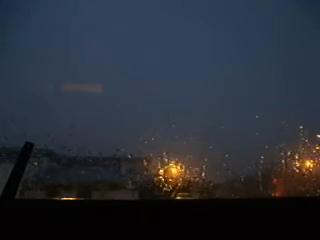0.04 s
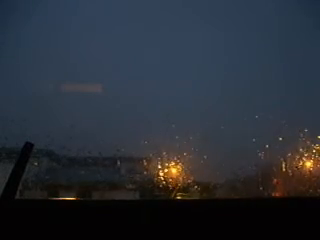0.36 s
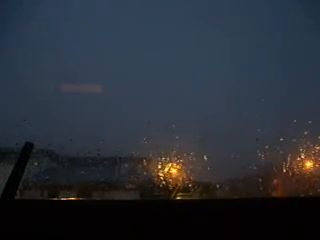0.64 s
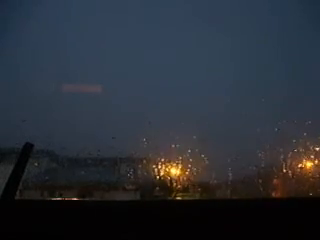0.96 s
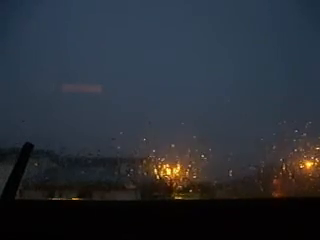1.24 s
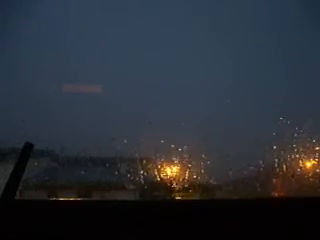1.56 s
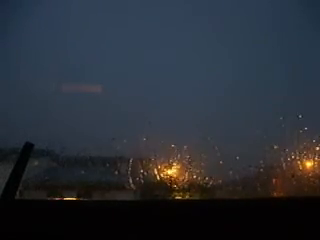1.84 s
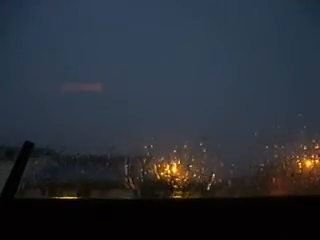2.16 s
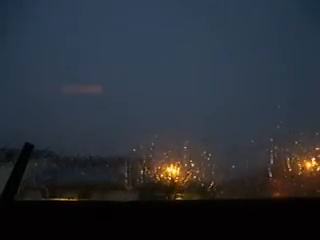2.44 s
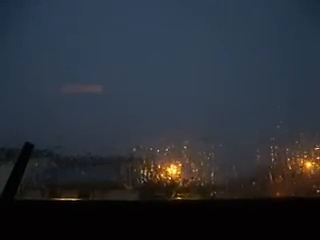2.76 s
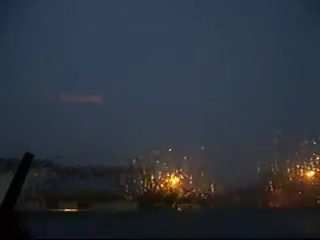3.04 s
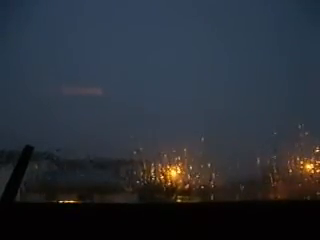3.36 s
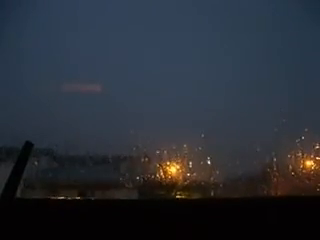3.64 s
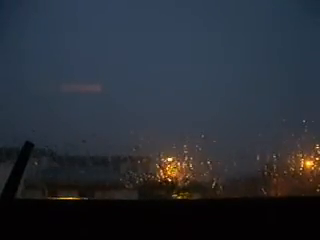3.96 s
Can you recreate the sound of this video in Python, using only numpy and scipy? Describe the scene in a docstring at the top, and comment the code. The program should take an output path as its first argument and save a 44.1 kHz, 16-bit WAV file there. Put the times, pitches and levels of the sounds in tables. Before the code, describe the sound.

Steady rain patters on a car windshield, with heavier drops ticking and splatting close by over a wash of rain on the street. Gusts of wind hit the microphone in short, low rumbles and pops.

```python
"""At a wet window above a street, one microphone out in a rainstorm.
Far off, rain on the street merges into a wash. Close by, fine drops patter on the pane, stray ones
tick brightly and heavy ones ring or splat. Gusts buffet the microphone: a low, ragged rumble that
brightens with force and pops when a strong eddy passes. The electronics add a faint whine."""
import sys
import numpy as np
from scipy import signal
from scipy.fft import rfft, irfft
from scipy.io import wavfile
from scipy.ndimage import map_coordinates

SR = 44100
rng = np.random.default_rng(int(sys.argv[2]) if len(sys.argv) > 2 else 0)


def put_to_file(sound):
    """Save the sound as 16-bit audio at rate SR, in the file named by the first command-line argument."""
    columns = np.atleast_2d(sound).T  # one column per channel
    safe = np.clip(columns, -1, 1)
    whole_steps = np.round(safe * 32767)
    wavfile.write(sys.argv[1], SR, whole_steps.astype(np.int16))


N = 176400
T = np.arange(N) / SR

# gusts on the microphone: start_s, length_s, level_db
GUSTS = [(0.34, 0.019, -36.5), (.865, 0.045, -34.5), (.953, 0.048, -35), (1.006, 0.034, -37),
         (1.133, 0.045, -31), (1.191, 0.04, -29), (1.292, 0.1, -34), (1.393, .04, -36.5),
         (1.466, 0.016, -30), (1.494, .035, -35.5), (1.623, 0.027, -31.5), (2.043, .012, -30),
         (2.064, .045, -28), (2.364, 0.019, -47), (2.7, .07, -36), (2.772, 0.047, -30), (2.826, 0.035, -32),
         (2.892, 0.056, -37), (2.935, .047, -35), (3.001, 0.087, -35.5), (3.264, 0.012, -38.5),
         (3.458, 0.021, -37), (3.505, 0.038, -36), (3.634, .05, -31.5), (3.731, .018, -36.5),
         (3.798, 0.068, -34.5), (3.834, .018, -34), (3.905, 0.011, -36.5), (3.94, .049, -36.5)]
# lighter wind between the gusts: time_s, level_db
BREEZE_LEVEL = [(0, -49.5), (.6, -45.5), (.85, -40.5), (1.5, -38), (1.75, -45), (2.1, -40.5), (2.45, -49),
                (2.9, -35.5), (3.35, -56.5), (4, -48)]
# turbulence at the reference wind force: frequency_hz, density_db
WIND_SPECTRUM = [(20, -8), (40, -2.5), (70, 2), (140, -0.5), (300, -1.5), (550, -10), (800, -12.5),
                 (1200, -30), (2000, -24), (3500, -64)]
# lift or cut of the wind's deep bass: time_s, gain_db
WIND_BASS_GAIN = [(0, -11), (.8, -4), (1.5, -7), (2.1, -3.5), (2.9, 3.5), (3.4, 4.5), (4, 2.5)]
# distant rain on the street: frequency_hz, density_db
WASH_SPECTRUM = [(30, -15.5), (100, 2.5), (250, -2.5), (500, 1.5), (800, 0), (1250, -2.5), (1900, -1),
                 (2600, -6.5), (4000, -9.5), (7000, -16.5), (8500, -24), (9700, -25.5), (11000, -47)]
# swell of the street rain: time_s, level_db
WASH_LEVEL = [(0, -42), (.7, -42.5), (1.3, -41), (1.8, -40), (2.3, -39.5), (2.8, -39.5), (3.3, -42),
              (4, -41)]
# fine drops on the pane: frequency_hz, density_db
PATTER_SPECTRUM = [(500, -23.5), (1200, -4), (2000, -3), (2700, 1), (3300, 4), (3900, -0.5), (4500, -3),
                   (6000, -8.5), (7200, -20), (8500, -14.5), (9700, -33), (11000, -45)]
# rise and fall of the rain on the pane: time_s, level_db
PATTER_LEVEL = [(0, -44), (.35, -47.5), (.8, -45), (1.2, -41), (1.42, -44.5), (1.6, -41), (1.78, -52.5),
                (1.88, -41.5), (2.15, -48), (2.35, -44.5), (2.58, -46.5), (2.85, -43.5), (3.1, -45),
                (3.4, -55), (3.7, -47.5), (4, -50)]
# tones from the electronics: pitch_hz, level_db
WHINE_TONES = [(8122, -73.5), (9868, -82)]
# stray light drops on the glass: frequency_hz, density_db
TICK_SPECTRUM = [(1000, -24), (3000, -4), (4500, 2), (6500, 0.5), (9000, -2), (11000, -30)]
# heavy drops close by: start_s, level_db, pitch_hz, ring_gain, spray_width_octaves, spray_decay_s
BIG_DROPS = [(.027, -34, 5500, .2, .7, .006), (0.4322, -25.5, 4120, 0.8, 0.51, 0.012),
             (.508, -27.5, 6500, 0.4, 0.42, 0.0057), (.647, -19.5, 1430, 0.6, 0.43, .007),
             (.741, -22.5, 4500, .6, 0.54, .005), (.906, -29, 4460, .4, 0.48, .009),
             (.9602, -33, 4500, .4, 0.56, .006), (1.022, -34, 5500, .3, 0.42, .01),
             (1.05, -27.5, 4800, .3, 0.58, 0.011), (1.327, -30, 4200, .4, 0.39, .006),
             (1.4918, -31, 5200, .3, 0.44, 0.0045), (1.5698, -22, 4300, 0.6, 0.47, 0.0054),
             (1.665, -23.5, 4200, .9, .25, .012), (1.677, -30, 4900, .4, 0.35, 0.011),
             (1.727, -35, 4800, .3, 0.62, .004), (1.8367, -17.5, 4560, 0.76, .25, .0065),
             (1.839, -23, 1100, .2, .7, 0.0087), (2.0915, -25.5, 3800, .3, 0.44, 0.0055),
             (2.1777, -20, 2270, .2, .7, 0.01), (2.335, -30.5, 5500, .2, .6, 0.033),
             (2.479, -22.5, 4800, 0.8, 0.36, .0083), (2.6524, -27, 3470, .4, 0.41, 0.029),
             (2.696, -31.5, 6560, 0.4, .6, .007), (2.8262, -21.5, 4950, 0.6, .25, .005),
             (2.836, -29, 5100, .5, .25, 0.014), (2.86, -22, 2900, .15, .55, .01),
             (2.894, -29, 6000, .2, 0.48, 0.01), (2.9, -26, 3300, .8, .3, 0.0046),
             (2.962, -22, 3300, 0.1, 0.55, .0081), (2.989, -34, 5500, .3, .6, .008),
             (3.1587, -30, 3860, .7, .3, .007), (3.9, -28, 4200, .4, 0.37, .012)]
# strong eddies at the microphone: centre_s, level_db, pitch_hz, swirl_relative_db
EDDIES = [(.343, -28, 300, 0), (.851, -24, 477, -8), (0.8584, -21, 340, -12), (0.8881, -27.5, 277, 2.5),
          (0.8969, -20, 553, -5), (.977, -24.5, 646, -6), (.982, -20, 342, -5.5), (1.151, -12.5, 516, -13),
          (1.165, -20, 680, -7), (1.2011, -23, 430, -7), (1.2276, -17.5, 423, -10),
          (1.4089, -17, 466, -3.5), (1.4592, -9.5, 300, -18), (1.479, -17.5, 700, -18),
          (2.0086, -16.5, 430, -14), (2.0134, -13, 443, -11), (2.0368, -13.5, 850, -20),
          (2.058, -21, 700, -10), (2.068, -14, 400, -7), (2.0721, -6.5, 680, -7), (2.083, -25, 650, -10),
          (2.0928, -9.5, 550, -5), (2.099, -16, 480, -6), (2.1102, -12, 350, -7), (2.1225, -11.5, 354, -20),
          (2.7265, -17.5, 348, -17), (2.7585, -17.5, 500, -16), (2.7867, -16, 630, -12),
          (2.793, -21, 750, -14), (2.7985, -18.5, 416, -0.5), (2.8082, -12.5, 720, -10),
          (2.835, -18, 710, -6.5), (2.883, -13, 450, -9), (2.946, -13, 600, -10), (2.9517, -5.5, 450, -15),
          (2.962, -14, 380, -16), (2.981, -16, 380, -9), (3.015, -23, 450, -10), (3.042, -14, 220, -12),
          (3.0487, -13.5, 340, -17), (3.054, -21, 530, -7), (3.269, -23.5, 294, -16),
          (3.6376, -23, 219, -15), (3.657, -16, 594, -10), (3.677, -12.5, 242, -15),
          (3.797, -20.5, 500, -18), (3.831, -19, 550, -14), (3.845, -11, 520, -2.5),
          (3.9135, -23, 220, -15)]


def undb(db):
    """Decibels to gain."""
    return 10 ** (np.asarray(db) / 20)


def unit(x):
    """Scale to rms 1."""
    return x / np.sqrt(np.mean(x ** 2))


def curve(rows):
    """Join (time_s, value) points by straight lines."""
    return np.interp(T, *np.array(rows).T)


def db_at(spectrum, hz):
    """Read a spectrum on a log-frequency axis."""
    points_hz, db = np.array(spectrum).T
    return np.interp(np.log(hz + 1e-3), np.log(points_hz), db)


def colour(x, spectrum):
    """Minimum-phase filter with the given spectrum."""
    gain = undb(db_at(spectrum, np.fft.rfftfreq(4096, 1 / SR)))
    cepstrum = irfft(np.log(gain))
    cepstrum[1:2048] *= 2  # fold onto positive time, so nothing rings before a hit
    cepstrum[2049:] = 0
    impulse = irfft(np.exp(rfft(cepstrum)))
    return signal.fftconvolve(x, impulse)[:len(x)]


def band_noise(hz, octaves, size):
    """Noise of rms 1 in a bell-shaped band."""
    away = np.log2((np.fft.rfftfreq(size, 1 / SR) + 1e-3) / hz) / octaves
    return unit(irfft(rfft(rng.standard_normal(size)) * np.exp(-.5 * away ** 2), size))


def wander(per_s):
    """Smooth random drift of rms 1."""
    knots = rng.standard_normal(2048)
    return unit(map_coordinates(knots, [T * per_s], order=3, mode="mirror"))


def with_tails(hits, decay_s):
    """Give every hit an exponential tail."""
    return signal.lfilter([1], [1, -np.exp(-1 / (decay_s * SR))], hits)


def add(out, x, at_s):
    """Mix a sound in at a time."""
    i = int(at_s * SR)
    out[i:i + len(x)] += x[:N - i]


def wind(attack_s=0.011, release_s=0.017, gust_trim_db=-1, reference_db=-28.5, bass_hz=130):
    """Turbulence right on the microphone: the harder the gust, the smaller and brighter its eddies."""
    power = undb(curve(BREEZE_LEVEL)) ** 2
    for start_s, length_s, level_db in GUSTS:
        before = np.maximum(start_s - T, 0) / attack_s
        after = np.maximum(T - start_s - length_s, 0) / release_s
        envelope = np.exp(-np.minimum(before + after, 20))
        power += (undb(level_db + gust_trim_db) * envelope) ** 2
    force_db = 10 * np.log10(power) - reference_db
    bands_hz = 25 * 2 ** np.arange(0, 7, .5)
    weights = undb(db_at(WIND_SPECTRUM, bands_hz)) * np.sqrt(bands_hz)
    rumble, bass_db = np.zeros(N), curve(WIND_BASS_GAIN)
    for hz, weight in zip(bands_hz, weights / np.linalg.norm(weights)):
        brighten_db = 0.41 * force_db * np.log2(max(hz / 200, 1))  # tilts the bands above 200 Hz
        shelf_db = bass_db / (1 + (hz / bass_hz) ** 4)
        rumble += weight * undb(brighten_db + shelf_db) * band_noise(hz, octaves=0.25, size=N)
    ragged_db = 4.5 * np.tanh(wander(per_s=140))
    return rumble * np.sqrt(power) * unit(undb(ragged_db))


def street_wash(flicker_db=0.74):
    """Countless distant drops on the street merge into a hiss."""
    hiss = unit(colour(rng.standard_normal(N), WASH_SPECTRUM))
    return hiss * undb(curve(WASH_LEVEL) + flicker_db * wander(per_s=18))


def pane_patter(drops_per_s=2500, spread_db=3, splash_share=0.44, flurry_db=1.22):
    """Fine drops of very uneven size strike the pane in flurries, each with a tiny splash."""
    lands = rng.random(N) < drops_per_s / SR
    sizes = undb(spread_db * np.minimum(rng.exponential(size=N), 6))
    hits = unit(lands * sizes * rng.choice([-1, 1], N))
    splash_power = with_tails(hits ** 2, decay_s=0.0034)
    splash = unit(np.sqrt(splash_power) * rng.standard_normal(N))
    drops = np.sqrt(1 - splash_share) * hits + np.sqrt(splash_share) * splash
    level_db = curve(PATTER_LEVEL) + flurry_db * wander(per_s=29.94)
    return unit(colour(drops, PATTER_SPECTRUM)) * undb(level_db)


def electronics_whine():
    """Thin steady tones from the electronics, faint under the rain."""
    return sum(np.sqrt(2) * undb(db) * np.sin(2 * np.pi * hz * T) for hz, db in WHINE_TONES)


def stray_ticks(ticks_per_s=16, spread_db=8.5, relative_db=-16.5):
    """Now and then a light drop on the glass stands out of the patter as a short bright burst."""
    lands = rng.random(N) < ticks_per_s / SR
    sizes = undb(spread_db * np.clip(rng.standard_normal(N), -2, 1))
    envelope = with_tails(lands * sizes + 1e-18, decay_s=.0012)
    ticks = unit(colour(envelope * rng.standard_normal(N), TICK_SPECTRUM))
    return ticks * undb(curve(PATTER_LEVEL) + relative_db)


def big_drops(attack_s=.00017, ring_s=.001, spray_db=-14, grit=0.39):
    """Heavy drops close to the microphone scatter a gritty spray; some ring briefly, others splat."""
    out, t = np.zeros(N), T[:8192]
    for start_s, level_db, pitch_hz, ring_gain, octaves, spray_s in BIG_DROPS:
        envelope = np.exp(-t / ring_s) * (1 - np.exp(-t / attack_s))
        ring = ring_gain * np.sin(2 * np.pi * pitch_hz * t) * envelope
        flutter = np.tanh(band_noise(hz=240, octaves=1, size=len(t)))
        droplets = unit(np.exp(grit * flutter))
        spray = band_noise(pitch_hz, octaves, size=len(t)) * droplets * np.exp(-t / spray_s)
        add(out, undb(level_db) * (ring + undb(spray_db) * spray), start_s)
    return out


def eddy_pops(core_cycles=0.36, falloff=2.67, wake_cycles=1.2, lean_rad=0.85, top_hz=1720):
    """A vortex crosses the microphone: a lopsided pressure dip between softer rises, amid swirls."""
    out, t = np.zeros(N), T[:4096] - T[2048]
    for centre_s, level_db, pitch_hz, swirl_db in EDDIES:
        cycles = t * pitch_hz
        offset = cycles / core_cycles  # from the centre, in core widths
        lean = lean_rad * rng.standard_normal()
        core = -np.real(np.exp(1j * lean) / (1 - 1j * offset) ** falloff)
        outside_core = offset ** 2 / (1 + offset ** 2)
        wake = np.exp(-np.abs(cycles) / wake_cycles) * outside_core
        swirls = band_noise(pitch_hz, octaves=0.32, size=len(t)) * wake
        add(out, undb(level_db) * (core + undb(swirl_db) * swirls), centre_s + t[0])
    return signal.sosfilt(signal.butter(2, top_hz, fs=SR, output="sos"), out)


def scene():
    """Wind on the microphone, rain far and near, and the whine, in mono."""
    buffeting = wind() + eddy_pops()
    rain = street_wash() + pane_patter() + stray_ticks() + big_drops()
    return (buffeting + rain + electronics_whine())[None]


def record(dry):
    """The recorder cuts the treble steeply above 10.6 kHz."""
    return signal.sosfilt(signal.ellip(8, .2, 70, 10600, fs=SR, output="sos"), dry)


dry = scene()
out = record(dry)
put_to_file(out)
```